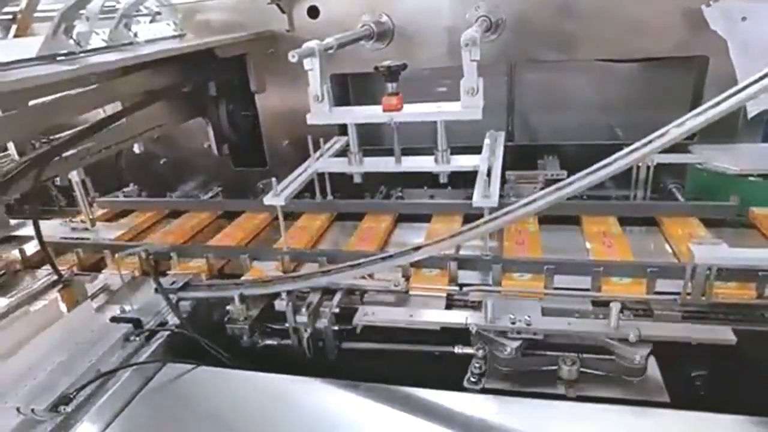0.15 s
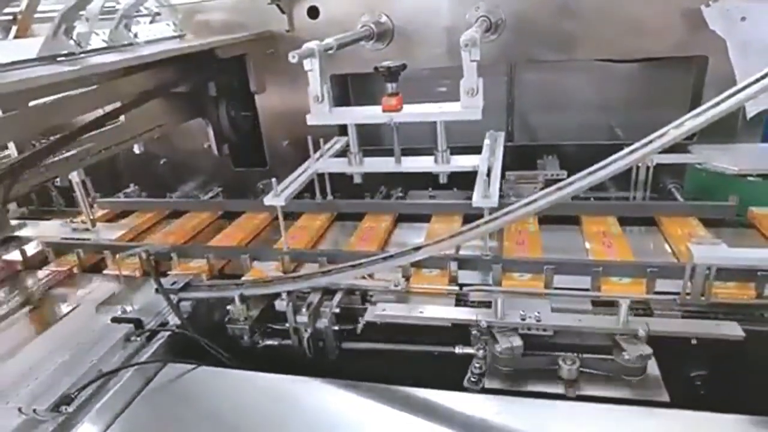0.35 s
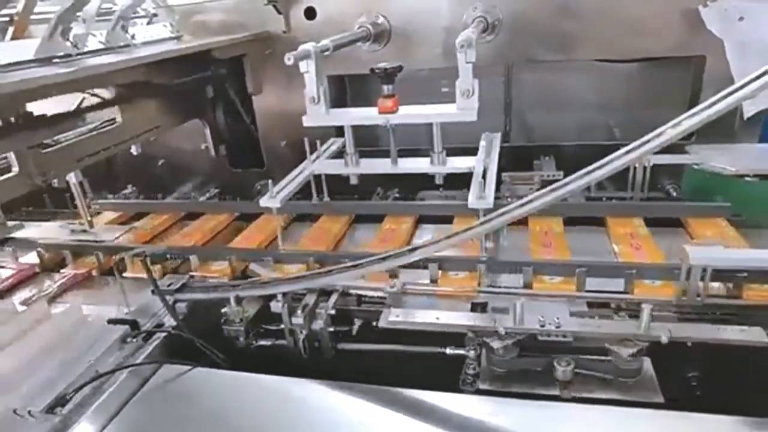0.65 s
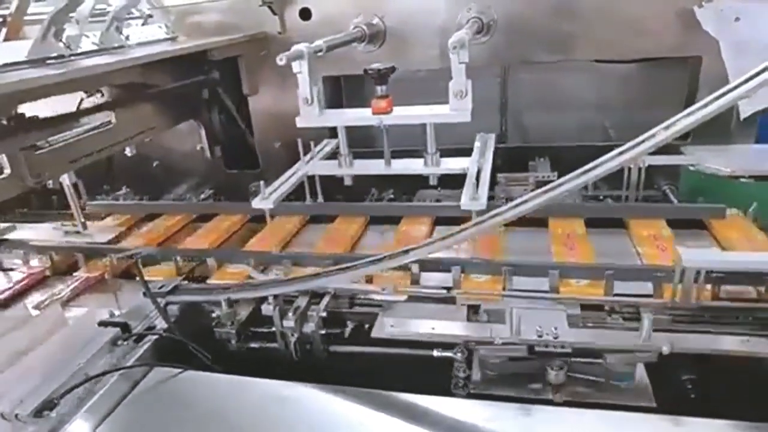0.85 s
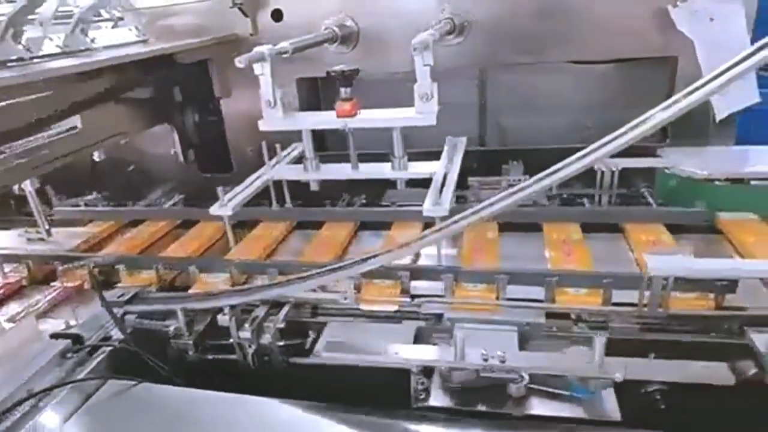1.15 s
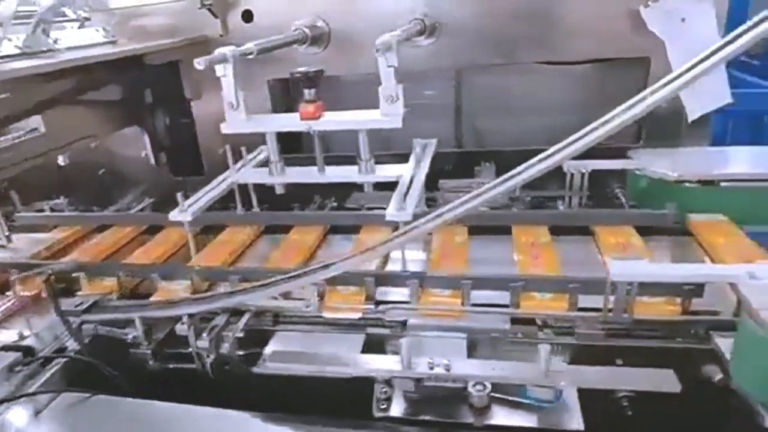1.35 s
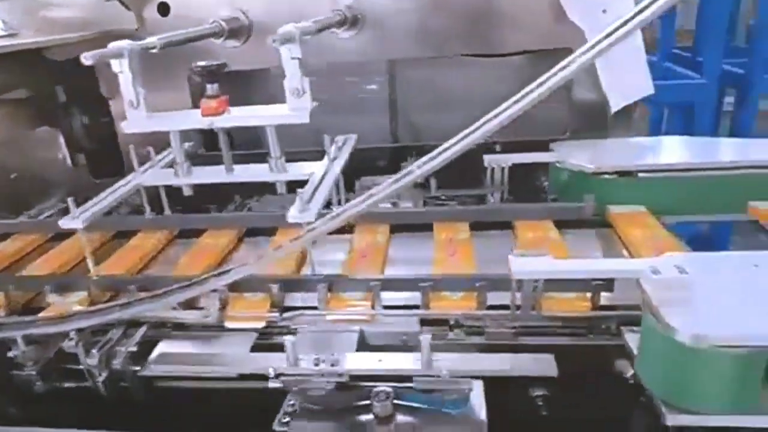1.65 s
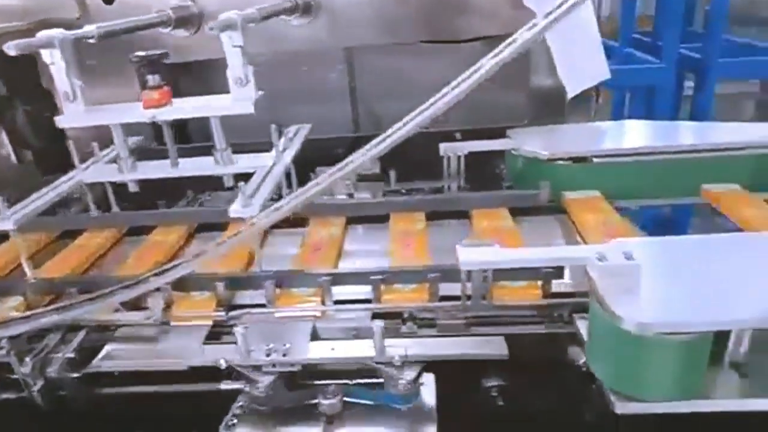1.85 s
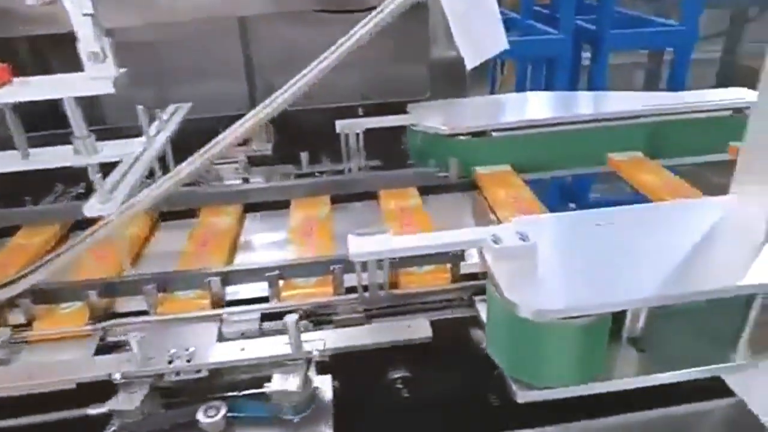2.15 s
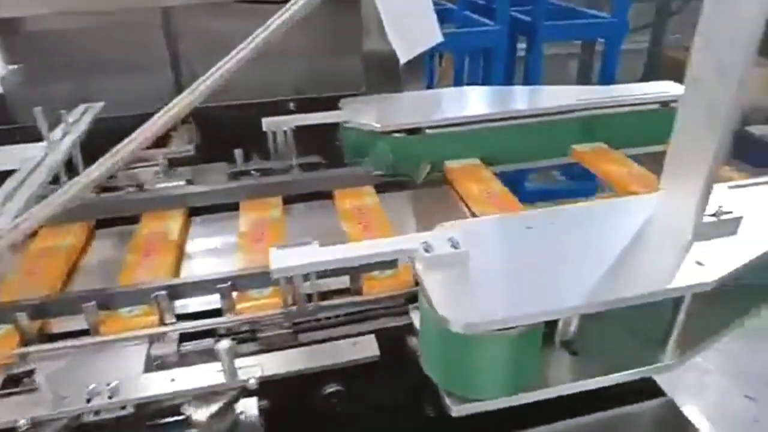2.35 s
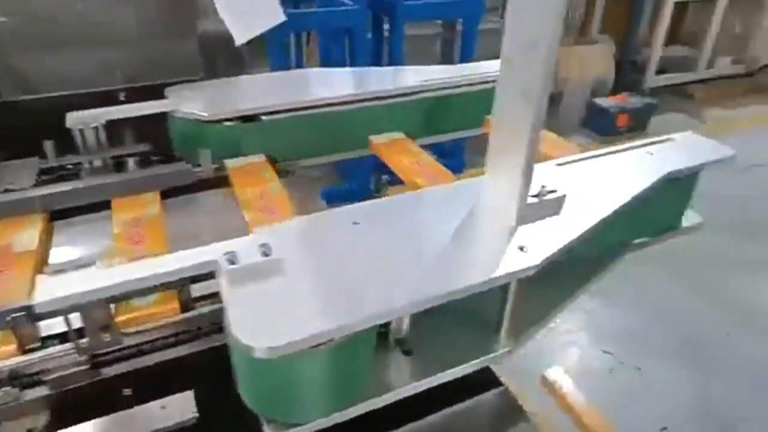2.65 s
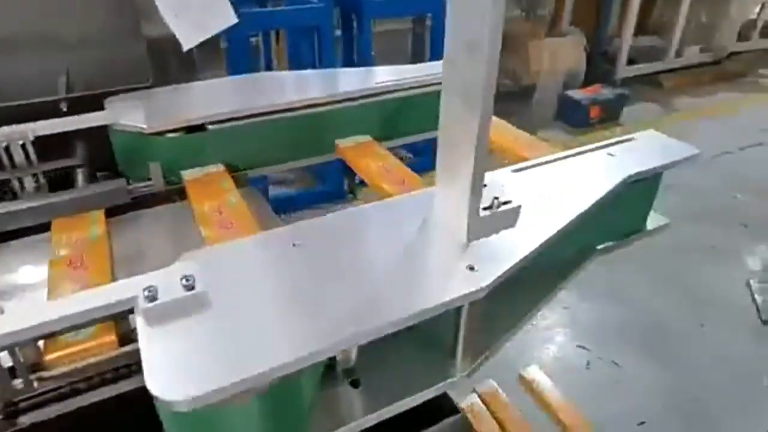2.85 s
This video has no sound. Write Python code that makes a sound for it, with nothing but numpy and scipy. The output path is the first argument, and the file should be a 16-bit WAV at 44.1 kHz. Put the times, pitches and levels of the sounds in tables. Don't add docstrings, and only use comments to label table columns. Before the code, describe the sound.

Packaging machine blasting and puffing compressed air, with steel knocks, clattering taps and a low carriage rumble

```python
import sys
import numpy as np
from scipy import signal
from scipy.fft import rfft, irfft
from scipy.io import wavfile
from scipy.ndimage import uniform_filter1d

SR = 44100
rng = np.random.default_rng(int(sys.argv[2]) if len(sys.argv) > 2 else 0)


def volts(x):
    e = np.asarray(x, float) / 20
    return 10 ** e


def generate_wav(signal):
    frames = np.transpose(np.atleast_2d(signal))
    scaled = np.clip(frames, -1, 1) * 32767
    pcm = np.round(scaled).astype(np.int16)
    wavfile.write(sys.argv[1], SR, pcm)


N = 132300
T = np.arange(N) / SR
HZ = np.maximum(np.fft.rfftfreq(N, 1 / SR), 1)
LEFT_LEAD_S = 0.00058

# [t/s, level/dB]
STROKE_LOAD = [(0, -40), (.15, -41), (.21, -34), (.28, -46), (.45, -36), (.56, -28), (.68, -29),
               (.78, -34.5), (.88, -34.5), (1.15, -37.5), (1.6, -42), (2.08, -43.5), (2.24, -27.5),
               (2.4, -29.5), (2.52, -33.5), (2.62, -35), (2.72, -34.5), (2.86, -36), (3, -44.5)]
# [f/Hz, level/dB]
RUMBLE_COLOUR = [(12, -47), (20, -14), (43, -7), (65, 0), (135, 4), (210, 0.2), (290, -3.5), (349, -11),
                 (409, -12.5), (600, -17.5), (780, -24), (1320, -120)]
# [f/Hz, level/dB]
RATTLE_COLOUR = [(250, -28), (400, 3.7), (800, 3.5), (1100, 0), (2500, 5), (6000, -13.5)]
# [f/Hz, level/dB]
HALL_COLOUR = [(180, 1.5), (300, 4.5), (537, -21), (787, 2), (1040, -4), (3580, -12.5), (6850, 3),
               (14500, -11.5), (16000, -46)]
# [t/s, peak level/dB, thin top level/dB]
PUFFS = [(0.016, -13.5, -18), (0.0637, -17, -33), (0.167, -15, -33), (0.506, -14, -18), (0.5881, -28, -26),
         (0.6723, -16.5, -3), (0.773, -13, -24), (0.818, -7, -10), (1.1775, -7, -38), (1.2555, -17.5, -29),
         (1.3264, -9.5, -11), (1.3792, -14, -3), (1.5354, -23, -23), (1.8153, -21, -29), (2.08, -14.5, -4),
         (2.178, -6, -10), (2.2484, -33, -32), (2.4458, -11.5, -13), (2.473, -10, -22), (2.7901, -30, -30),
         (2.859, -28, -40), (2.9322, -44, -48)]
# [f/Hz, level/dB]
PUFF_COLOUR = [(2060, -23), (3500, -18), (4670, -17), (6400, -10), (7580, -3.5), (12000, -19.5),
               (15600, -55), (22000, -120)]
# [f/Hz, level/dB]
JET_TOP_COLOUR = [(9000, -30), (11000, 0.1), (14800, -3), (15800, -12)]
# [f/Hz, level/dB]
ECHO_COLOUR = [(500, 4.5), (9000, -9)]
# [t/s, peak level/dB, scrape length/s, loudest mode f/Hz]
KNOCKS = [(0.102, -29.5, 0.033, 1270), (0.145, -26.5, 0.016, 890), (0.202, -21.5, 0.0096, 690),
          (0.457, -20.5, 0.05, 1700), (0.533, -19.5, 0.036, 2260), (0.813, -24, 0.0068, 870),
          (0.942, -18.5, 0.1, 870), (0.959, -12.5, 0.02, 2230), (1.167, -20, 0.02, 790),
          (1.521, -41, 0.012, 830), (1.737, -30.5, 0.022, 2090), (1.886, -26.5, 0.021, 2200),
          (1.962, -25, 0.011, 2080), (2.119, -24.5, 0.066, 2250), (2.202, -21, 0.028, 1740),
          (2.475, -24, 0.016, 2020), (2.599, -11.5, 0.014, 950), (2.604, -15, 0.0089, 1560),
          (2.638, -30, 0.01, 1690), (2.67, -17.5, 0.039, 1260), (2.72, -32, 0.025, 770),
          (2.771, -23, 0.018, 720)]
# [f/Hz, width/Hz, level/dB]
FRAME_MODES = [(915, 77, 7), (1454, 265, 6.5), (2230, 940, 10)]
# [f/Hz, level/dB]
SCRAPE_COLOUR = [(300, -5), (600, 8.0), (2800, -0.5), (4000, -3.0)]
# [t/s, level/dB, attack/s, 60 dB decay/s, nozzle f/Hz]
BLASTS = [(0.188, -15, 0.03, 0.45, 5100), (.33, -32.5, 0.087, 1, 4500), (.51, -30.5, 0.038, 0.98, 6850),
          (0.957, -23.5, 0.019, 0.33, 6500), (1, -15.5, 0.024, 0.28, 4370), (1.808, -35, 0.02, 0.7, 5200),
          (1.915, -34.5, 0.024, 1, 6370), (2.05, -36.5, 0.068, 0.72, 6460), (2.2, -31, 0.033, 1, 5700),
          (2.351, -30, 0.017, 0.2, 6930), (2.49, -30.5, .03, 1, 7100), (2.6, -23.5, 0.011, 0.41, 4560),
          (2.622, -39, 0.0053, 0.41, 5900), (2.66, -33.5, 0.028, 0.11, 5800)]
# [f/Hz, level/dB]
BLAST_COLOUR = [(880, -22), (1500, -20.5), (1960, -12), (3310, -7), (4420, -4.5), (6890, 1.5), (8500, 5),
                (11300, -10), (15800, -34)]
# [t/s, level/dB, f/Hz, length/s]
SINGS = [
    (0.457, -40, 1530, 0.051),
    (0.811, -39, 1470, .015),
    (0.957, -29, 2230, 0.027),
    (0.977, -30, 863, .025),
    (1.167, -42, 1610, 0.044),
    (1.506, -43, 795, .03),
    (1.774, -38, 2870, 0.056),
    (1.778, -45, 1418, 0.046),
    (2.207, -32.5, 1640, 0.033),
    (2.492, -30, 7300, 0.016),
]
TAP_TIMES = [.5162, .5392, .8749, .9453, 1.6861, 1.696, 1.8996, 1.9649, 1.9974, 2.1874, 2.2129, 2.2568,
             2.3002, 2.3476, 2.4838, 2.5476, 2.6244]
# [peak level/dB, length/s, ring f/Hz, body level/dB]
TAP_MAKES = [(-27, 0.0015, 8400, 6), (-22, 0.0022, 2500, -30), (-18, 0.035, 4200, -16),
             (-12, 0.028, 1670, -18), (-18, 0.0023, 6100, -16), (-24.5, 0.0018, 7400, -22),
             (-7.5, 0.011, 4160, -21), (-14, 0.0052, 4300, -10.5), (-30, 0.002, 4600, -25),
             (-7, 0.0035, 4100, -17), (-26, 0.005, 5900, -9), (-15.5, 0.0012, 17000, -11),
             (-13.5, 0.003, 3900, -25), (-12, 0.0021, 9230, -7), (-7, 0.01, 10200, -15.5),
             (-6.5, 0.003, 12800, -11.5), (-7.5, 0.0023, 6700, -13)]
# [f/Hz, level/dB]
CRACK_COLOUR = [(3000, -22.5), (4200, -9.5), (6500, 1), (8600, 2.3), (11500, -14.5), (15500, -40)]
# [f/Hz, level/dB]
BODY_COLOUR = [(1000, -47), (1900, 7), (3000, 7), (4500, -30), (6000, -2.5)]
# [t/s, peak level/dB, mode f/Hz, 60 dB decay/s]
TICKS = [(0.517, -8.5, 6200, 0.023), (0.585, -20, 7860, 0.017), (0.703, -17, 7700, 0.02),
         (0.775, -10.5, 7400, 0.02), (0.8175, -14, 6420, 0.024), (0.825, -17.5, 5650, 0.018),
         (0.8752, -2, 7500, 0.0098), (0.9618, 0, 7700, 0.0095), (1.1757, -10, 7700, 0.018),
         (1.2593, -15, 6900, 0.02), (1.328, -28, 7200, 0.018), (1.686, -13, 7350, 0.02),
         (1.6964, -12.5, 6940, 0.017), (1.8985, -6.5, 3220, 0.011), (1.9054, -7, 4340, 0.02),
         (1.917, -19, 7540, 0.018), (1.937, -15, 6920, 0.02), (1.965, -15, 6100, 0.02),
         (1.9974, -13.5, 7060, 0.014), (2.1804, -29, 7100, 0.016), (2.1874, -24, 7050, 0.0092),
         (2.2129, -4.5, 4960, 0.036), (2.2563, 0, 5620, 0.02), (2.3002, -26, 6800, 0.02),
         (2.3472, -4.5, 7500, 0.022), (2.3646, -9, 6290, 0.026), (2.4838, -11, 8100, 0.018),
         (2.4884, -8, 7130, 0.02), (2.5016, -18, 7460, 0.023), (2.548, -9.5, 7630, 0.04),
         (2.5614, -19, 7600, 0.022), (2.6027, -3.5, 7440, 0.02), (2.6253, 1, 7400, 0.014),
         (2.6384, -6, 7700, 0.02), (2.7925, -16.5, 6920, 0.017), (2.8613, -17, 7500, 0.044),
         (2.9344, -17, 6800, 0.028)]
# [f/Hz, level/dB]
TICK_EDGE_COLOUR = [(1500, 6), (5000, -13), (9000, 2.0), (15000, -2)]
# [t/s, level/dB]
WHISTLE_SWELL = [
    (1.41, -62),
    (1.5, -46),
    (1.63, -47),
    (1.71, -55),
    (1.75, -80),
    (2.82, -80),
    (2.92, -49),
    (3.0, -50),
]
# [f/Hz, level/dB]
UNSHARED = [(30, -21), (300, -13.5), (700, -7.5), (1400, -1.5), (4000, 0), (7000, -4.5), (9000, -13),
            (15000, -0.5)]
# [f/Hz, level/dB]
LEFT_TILT = [(40, 0.75), (300, 0.52), (1500, 0.46), (5000, -1.46), (8000, -0.065)]


def curve(table, x, log=False):
    a = np.array(table, float)
    if log:
        return np.interp(np.log(x), np.log(a[:, 0]), a[:, 1])
    return np.interp(x, a[:, 0], a[:, 1])


def unit(x):
    return x / np.sqrt(np.mean(x ** 2))


def pair(colour):
    shared, other = rfft(rng.standard_normal((2, N)))
    other = other * volts(curve(UNSHARED, HZ, True))
    turns = np.clip((HZ - 650) * LEFT_LEAD_S, 0, 4)
    late = np.exp(-2j * np.pi * turns)
    both = np.array([shared + other, (shared - other) * late])
    return unit(irfft(both * volts(curve(colour, HZ, True)), N))


def walk(rate):
    k = int(SR / rate)
    steps = np.repeat(rng.standard_normal(N // k + 1), k)
    return unit(uniform_filter1d(uniform_filter1d(steps, k), k)[:N])


def burst(t, attack, hold, t60):
    rise = np.clip(t / max(attack, 1e-4), 0, 1) ** 2
    falling = np.clip(t - attack - max(hold, 0), 0, 9)
    return rise * volts(-60 * falling / max(t60, 1e-3))


def ring(x, hz, width):
    b, a = signal.iirpeak(hz, hz / width, fs=SR)
    return signal.lfilter(b, a, x)


def strike(s, attack, hold, t60):
    i = max(int((s - attack / 2) * SR), 0)
    part = slice(i, i + SR // 2)
    return part, burst(T[part] - T[i], attack, hold, t60)


def carriage():
    load_db = curve(STROKE_LOAD, T)
    rumble = volts(load_db + 2.0 * walk(25)) * pair(RUMBLE_COLOUR)
    rattle_db = -38.5 + 1.3 * (load_db + 31)
    throb_db = 1.5 * walk(30.72)
    grit_db = 2.0 * walk(300)
    return rumble + volts(rattle_db + throb_db + grit_db) * pair(RATTLE_COLOUR)


def hall_hiss():
    return volts(-42.5 + 1.1 * walk(3.03) + 0.37 * walk(17.0)) * pair(HALL_COLOUR)


def puffs():
    attack_s, hold_s, t60_s = 0.004, 0.0031, 0.16
    air = pair(PUFF_COLOUR) * volts(2.2 * walk(240))
    top = pair(JET_TOP_COLOUR)
    out = np.zeros((2, N))
    for s, db, top_db in PUFFS:
        part, gate = strike(s, attack_s, hold_s, t60_s)
        jet = air[:, part] + volts(top_db - 2.5) * top[:, part]
        out[:, part] += volts(db - 18.5) * gate * jet
    return out


def hall_echo(near):
    room_t60_s, room_db = 0.7, -11
    gate = burst(T[:SR] - 0.006, 0.0069, 0, room_t60_s)
    tail = unit(pair(ECHO_COLOUR)[:, :SR] * gate) / np.sqrt(SR)
    return volts(room_db) * signal.fftconvolve(near[:1], tail, axes=1)[:, :N]


def knocks():
    attack_s, t60_s, ring_width_hz = 0.004, 0.13, 210
    scrape = pair(SCRAPE_COLOUR) * volts(walk(120))
    modes = sum(volts(db) * ring(scrape, hz, width) for hz, width, db in FRAME_MODES)
    steel = unit(modes + volts(-21) * scrape)
    out = np.zeros((2, N))
    for s, db, length, hz in KNOCKS:
        part, gate = strike(s, attack_s, length, t60_s)
        loudest = volts(12.0) * ring(gate * scrape[:, part], hz, ring_width_hz)
        out[:, part] += volts(db - 16) * (gate * steel[:, part] + loudest)
    return out


def blasts():
    out = np.zeros((2, N))
    air = pair(BLAST_COLOUR) * volts(1.5 * walk(300))
    top = pair(JET_TOP_COLOUR)
    for s, db, attack, t60, hz in BLASTS:
        gate = burst(T - s, attack, 0.43 * attack, t60)
        nozzle = volts(1) * ring(air, hz, 710)
        out += volts(db) * gate * (air + nozzle + volts(-11.5) * gate * top)
    return out


def sings():
    drift = 2 * np.pi * np.cumsum(1 + 0.0127 * walk(60)) / SR
    lag = np.array([[0], [2 * np.pi * LEFT_LEAD_S]])
    out = np.zeros((2, N))
    for s, db, hz, length in SINGS:
        part, gate = strike(s, 0.0064, length, 0.045)
        out[:, part] += volts(db) * gate * np.sin(hz * (drift[part] - lag))
    return out


def taps():
    attack_s, t60_s, ring_db, ring_width_hz = 0.0012, 0.085, 9, 170
    grit = volts(1 * walk(400))
    crack = pair(CRACK_COLOUR) * grit
    body = pair(BODY_COLOUR) * grit
    out = np.zeros((2, N))
    for s, (db, length, hz, body_db) in zip(TAP_TIMES, TAP_MAKES):
        part, gate = strike(s, attack_s, length, t60_s)
        hit = gate * (crack[:, part] + volts(body_db + 8.5) * body[:, part])
        ringing = ring(gate * (crack + body)[:, part], hz, ring_width_hz)
        out[:, part] += volts(db - 13.5) * (hit + volts(ring_db) * ringing)
    return out


def ticks():
    mode_db, high_db, edge_db, plate_hz = -12, -12.5, -24, 8700
    edge = pair(TICK_EDGE_COLOUR)
    out = np.zeros((2, N))
    chance = rng.standard_normal((len(TICKS), 3))
    for (s, db, hz, t60), (turn, detune, high_turn) in zip(TICKS, chance):
        i = int(s * SR)
        part = slice(i, i + SR // 10)
        t = T[part] - s
        high_hz = plate_hz * (1 + 0.0496 * detune)
        mode = volts(mode_db) * np.sin(2 * np.pi * hz * t + np.array([[0], [turn]]))
        high = volts(high_db) * np.sin(2 * np.pi * high_hz * t + np.array([[0], [0.9 * high_turn]]))
        gate = burst(t, 0.00043, 0, t60)
        out[:, part] += volts(db) * gate * (mode + high + volts(edge_db) * gate * edge[:, part])
    return out


def whistle():
    drive_hz = 6670 * (1 + 0.00065 * walk(11))
    phase = 2 * np.pi * np.cumsum(drive_hz) / SR
    level_db = curve(WHISTLE_SWELL, T) + 4 + 1.3 * walk(27.3)
    return volts(level_db) * np.sin(phase + np.array([[0], [-0.8]]))


def scene():
    near = puffs() + knocks() + blasts() + sings() + taps() + ticks()
    return near + hall_echo(near) + carriage() + hall_hiss() + whistle()


def roll_off(x):
    return signal.sosfilt(signal.butter(12, 15830, fs=SR, output="sos"), x)


def record(dry):
    port_hz, port_width_hz, port_db, top_hz = 8400, 800, -3, 15830
    heard = dry + volts(port_db) * ring(dry, port_hz, port_width_hz)
    tilt_db = curve(LEFT_TILT, HZ, True)
    tilt = volts(np.array([tilt_db, -tilt_db]))
    mix = irfft(rfft(heard) * tilt * (HZ < top_hz), N)
    return roll_off(np.tanh(mix))


dry = scene()
out = record(dry)
generate_wav(out)
```